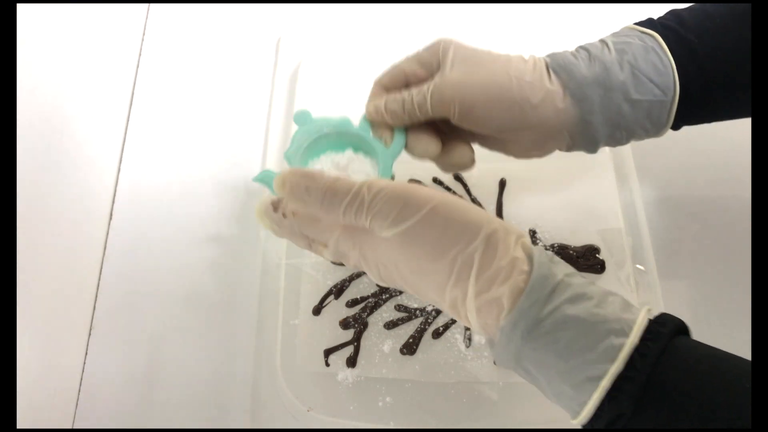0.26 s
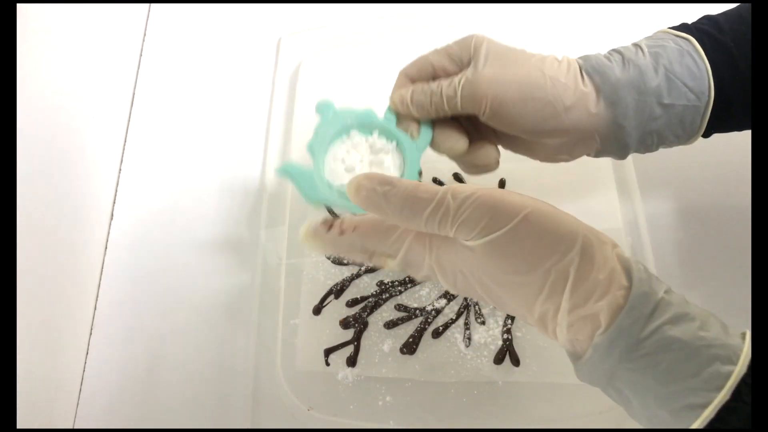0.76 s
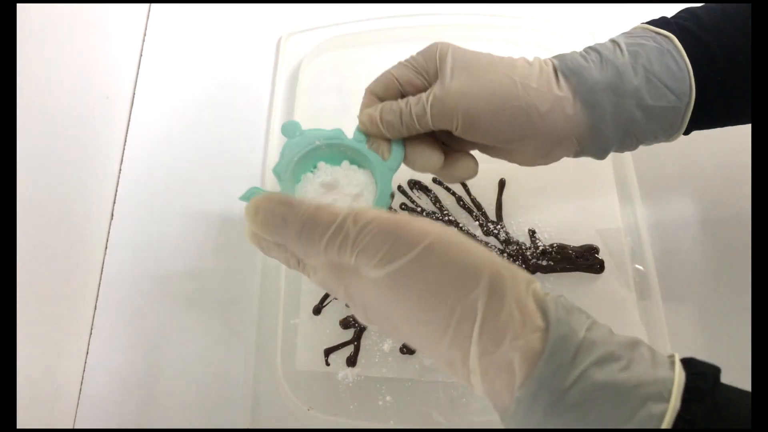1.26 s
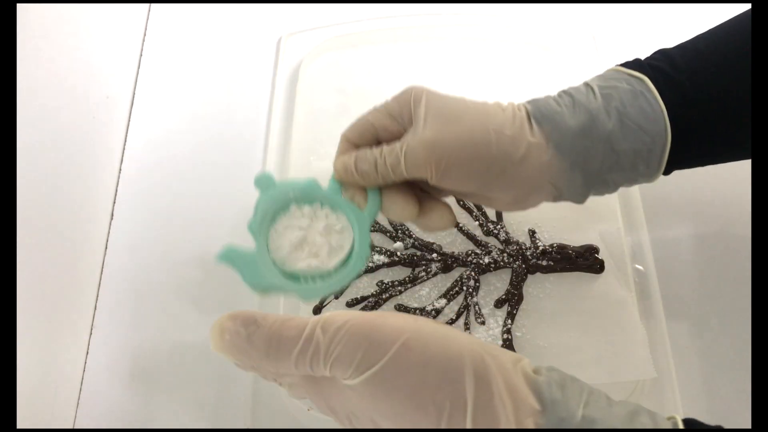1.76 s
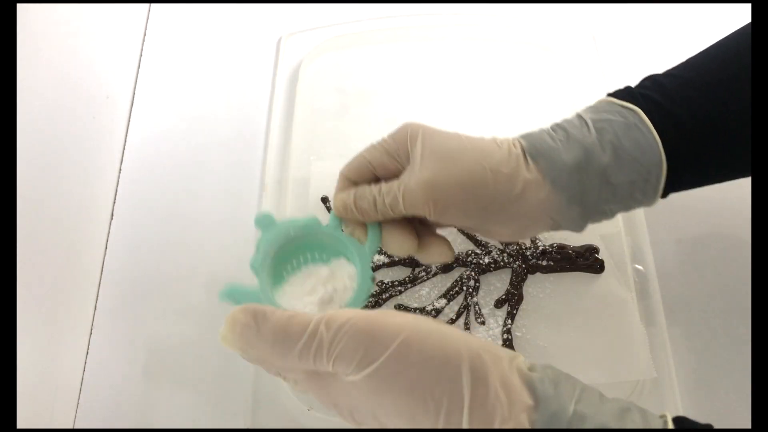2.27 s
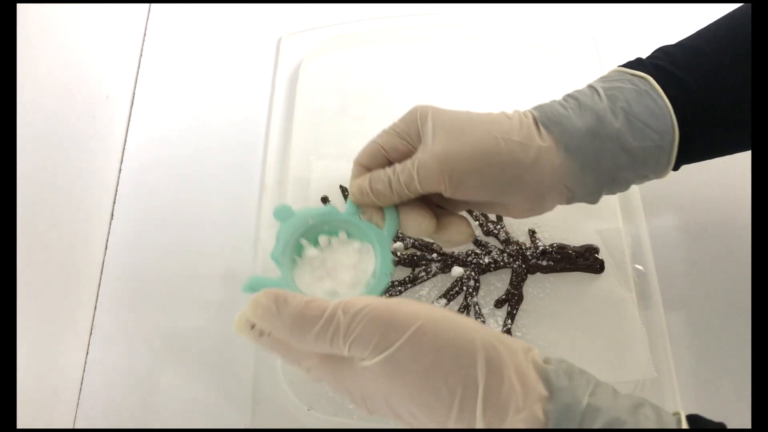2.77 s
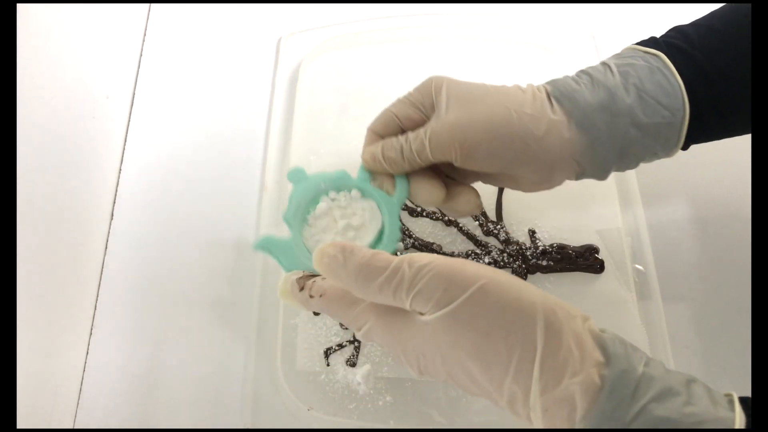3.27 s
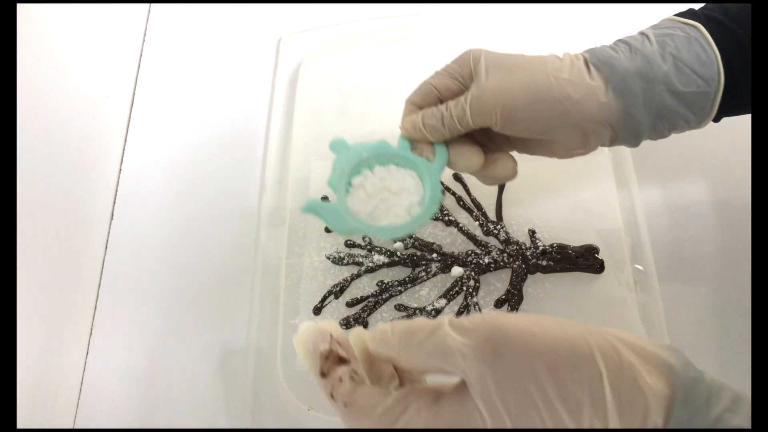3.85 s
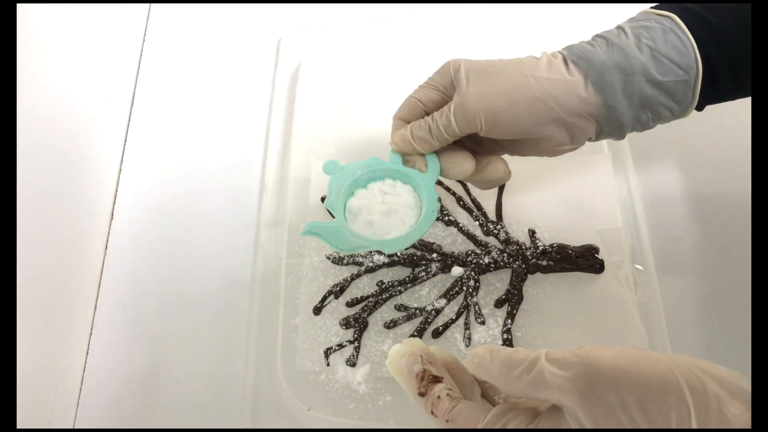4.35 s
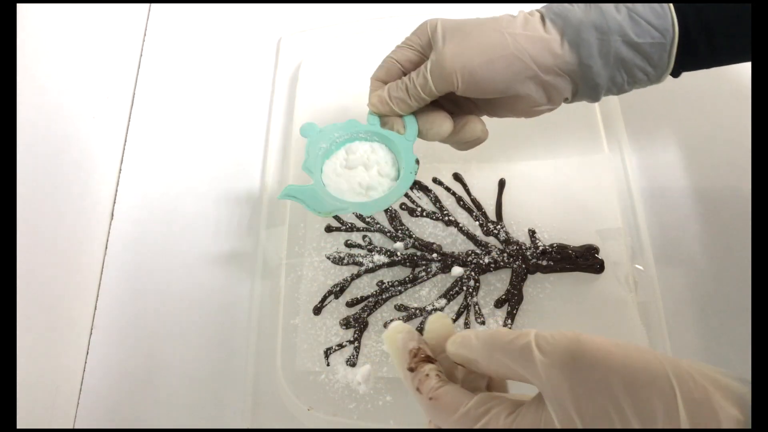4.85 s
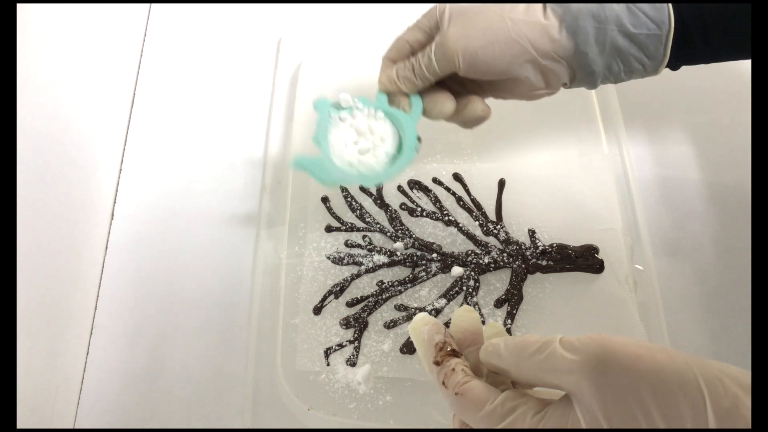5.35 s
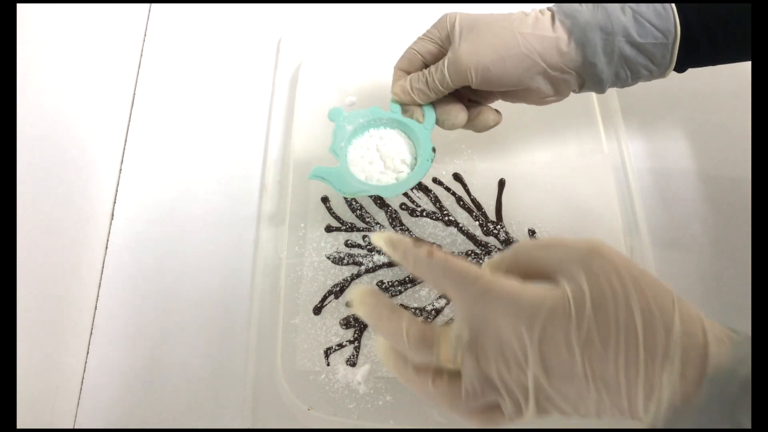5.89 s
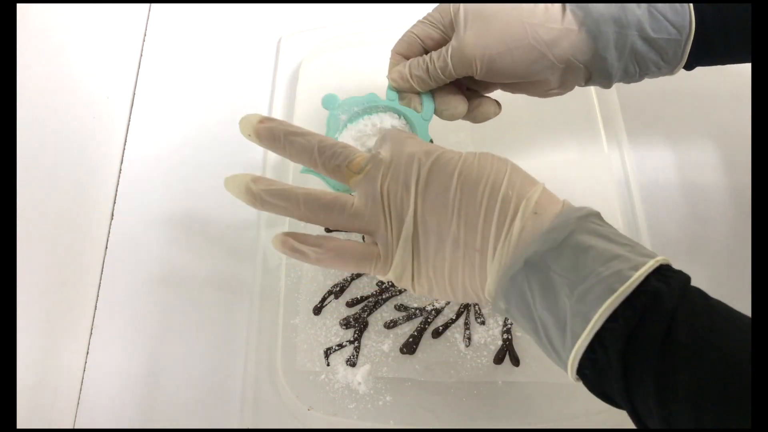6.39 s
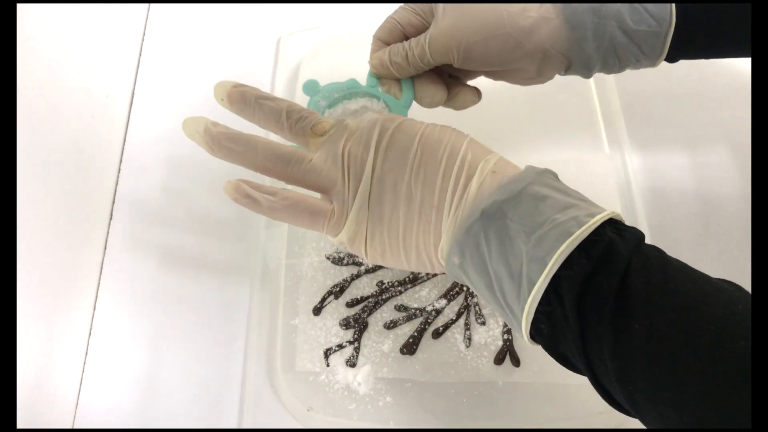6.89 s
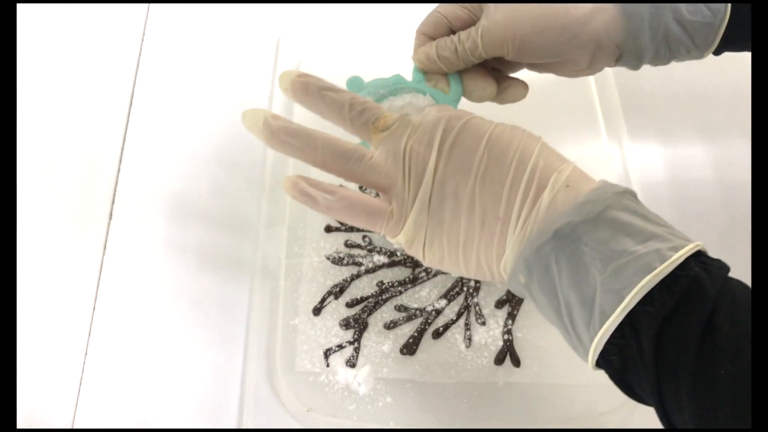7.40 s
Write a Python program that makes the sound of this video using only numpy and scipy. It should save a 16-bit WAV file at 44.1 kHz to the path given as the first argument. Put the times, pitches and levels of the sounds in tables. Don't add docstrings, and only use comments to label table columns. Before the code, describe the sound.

Light crisp ticks and short gritty swishes of sugar in a little plastic sieve, two dull table bumps, faint fridge hum behind.

```python
import sys
import numpy as np
from scipy import signal
from scipy.fft import rfft, irfft
from scipy.io import wavfile
from scipy.ndimage import uniform_filter1d

SR = 44100
rng = np.random.default_rng(int(sys.argv[2]) if len(sys.argv) > 2 else 0)


def amplitude_ratio(level_db):
    exponent = np.asarray(level_db, float) / 20
    return 10 ** exponent


def transcribe(signal):
    frames = np.atleast_2d(signal).T
    limited = np.clip(frames, -1, 1)
    pcm = np.round(limited * 32767).astype(np.int16)
    wavfile.write(sys.argv[1], SR, pcm)


N = 336483

# frequency in Hz, density in dB per Hz.
AIR_SPECTRUM = [(18, -51), (36, -11.5), (170, 0.5), (328, -3.5), (461, -7), (512, -7), (569, -6),
                (1070, -17.5), (2120, -21.5), (4530, -23), (8520, -28), (10200, -35), (11400, -32.5),
                (14400, -36.5), (16000, -39.5)]
AIR_DB = -55.5
# multiple of the turning rate, level in dB, unsteadiness in dB.
FRIDGE_LINES = [(2, -68.5, 5.5), (3, -74, 1.5), (4, -63, 7), (5, -60.5, 7), (6, -65, 6.5), (8, -70, 4),
                (13, -62, 1.5)]
FRIDGE_TURNS_HZ = 39.9
ECHO_DB, ECHO_T60_S = -13.5, 0.44

# time in seconds, level in dB.
SIFTING_LEVELS = [(0.0, -62.5), (1.32, -69), (2.15, -62), (2.44, -60), (2.95, -64), (3.4, -61),
                  (3.7, -60.5), (3.92, -60.5), (4.07, -54), (4.33, -56.5), (5.3, -69.5), (6.18, -52.5),
                  (6.38, -49.5), (6.54, -53), (7.07, -61.5), (7.22, -55), (7.46, -99), (7.63, -52)]

# frequency in Hz, level in dB, 60 dB decay time in seconds.
TABLE_MODES = [(165, -13, 0.07), (248, -26.5, 0.052), (322, 2, 0.06), (440, 0.5, 0.039), (573, 1.5, 0.125),
               (648, -10.5, 0.1), (764, -7.5, 0.12), (914, -1.5, 0.06), (1100, -9, 0.053),
               (1270, -3, 0.031), (1935, -18, 0.08), (1438, 0, 0.055), (1643, -1, 0.03),
               (1704, -16.5, 0.098), (2010, -20, 0.09), (2260, -16.5, .04), (2530, -5, 0.07),
               (2640, -8.5, 0.04), (2950, -12, .06)]
# start in seconds, blow in dB, judder in dB, judder length in ms, favoured modes in Hz.
TABLE_BUMPS = [(.113, -53, -77, 8.5, 1410), (1.731, -55.5, -76, 9.2, 1400), (1.909, -55, -71, 10, 990),
               (2.099, -50, -73, 10, 1210), (2.298, -61, -52.5, 18, 1100), (2.495, -13.5, -45, 5.3, 960),
               (2.506, -27, -38, 89, 614), (2.558, -33, -36.5, 40, 1260), (2.565, -30, -41, 60, 412),
               (2.652, -52, -49, 42, 590), (4.556, -59, -75, 10, 1390), (5.594, -51, -36, 25, 820),
               (5.611, -25, -39, 19, 835), (5.634, -32.5, -36, 13, 1100), (5.647, -28, -42.5, 43, 1600),
               (5.668, -31, -34, 12, 380), (5.69, -32, -48, 17, 380), (5.743, -34.5, -50, 16, 373),
               (5.812, -38, -60, 20, 350), (5.839, -43, -52, 29, 310), (5.862, -41, -53, 18, 290),
               (7.007, -63, -67, 13, 2000)]
CONTACT_MS, SOFTNESS = 0.43, 1.32

# frequency in Hz, width in Hz, level in dB.
SIEVE_MODES = [(2570, 580, 0.5), (3440, 540, -5.5), (3340, 110, -2.5), (4305, 860, 0), (4600, 130, -3),
               (5300, 690, -7.5), (5900, 150, -3.5), (6610, 450, -5), (7366, 180, -1.5), (8400, 370, 2.5),
               (9330, 660, 2), (11220, 880, 6), (11540, 1100, 9), (12770, 640, 11.5), (14300, 900, 7.5),
               (16300, 400, -22)]
MODE_GROUP_EDGES_HZ = (2800, 5500, 9500, 16000)
MESH_DB = 3.5

# start in seconds, contact in ms, level in dB, mode in Hz.
LUMP_PINGS = [(0.125, 3.5, -43, 7160), (0.297, 6.3, -42.5, 3620), (0.3, 7.7, -42.5, 6550),
              (0.301, 3.5, -45, 9500), (0.456, 3.5, -36.5, 4340), (0.489, 9.5, -48, 4880),
              (0.493, 7, -42, 6270), (0.496, 1.5, -39, 9300), (0.651, 3.6, -42, 10740),
              (0.652, 2.6, -40, 4800), (0.683, 1.5, -33.5, 9400), (0.699, 1.6, -31, 6430),
              (0.701, 2.3, -34.5, 4130), (0.864, 1.7, -26.5, 4350), (0.885, 1.7, -39, 4820),
              (0.887, 11, -48, 3790), (1.31, 2.0, -38, 5400), (1.319, 4.5, -42.5, 5030),
              (1.534, 2.0, -40, 4820), (1.632, 2.5, -40, 4580), (1.645, 1.5, -32.5, 11150),
              (1.644, 1.9, -30, 4480), (1.738, 4.3, -40.5, 5530), (1.848, 1.3, -33.5, 4650),
              (1.909, 2.6, -46, 8610), (1.909, 4.5, -47, 4130), (1.98, 1.3, -60, 11700),
              (2.044, 3, -37, 4570), (2.046, 1.5, -32, 9130), (2.1, 5.0, -42.5, 6840),
              (2.102, 3.0, -45, 8700), (2.105, 1.7, -37.5, 3230), (2.186, 1.5, -37.5, 6000),
              (2.233, 4.5, -40, 8500), (2.25, 1.5, -38, 4550), (2.25, 1.5, -32.5, 12230),
              (2.284, 2.5, -35.5, 6050), (2.301, 5.5, -52.5, 11000), (2.315, 1.5, -33, 13780),
              (2.446, 4.5, -42.5, 8270), (2.488, 1.1, -31.5, 5680), (2.662, 2.0, -37, 6220),
              (2.664, 2.0, -41, 7700), (2.664, 4.7, -41, 4780), (2.998, 1.5, -36, 4730),
              (3.034, 2.8, -39.5, 6630), (3.196, 1.3, -31, 11800), (3.196, 1.5, -33.5, 9200),
              (3.196, 2.5, -49, 7400), (3.341, 4.5, -42, 8700), (3.342, 1.6, -37, 11400),
              (3.38, 5.9, -40, 4430), (3.397, 2.6, -35.5, 3250), (3.499, 1.5, -38, 6600),
              (3.499, 2.7, -27.5, 4320), (3.501, 2.4, -31, 5730), (4.014, 1.1, -34.5, 10600),
              (4.153, 2.4, -28.5, 5150), (4.154, 1.5, -26.5, 5900), (4.157, 5.5, -51, 7000),
              (4.478, 1.5, -35, 5030), (4.477, 2.0, -36, 12000), (4.476, 4.0, -42, 8640),
              (4.551, 1.3, -35, 10500), (4.552, 4.5, -38, 4130), (4.558, 2.5, -53, 8550),
              (4.81, 2.5, -40.5, 5070), (4.885, 1.9, -35, 4380), (5.344, 1.9, -38.5, 8550),
              (5.425, 1.4, -49, 12700), (5.425, 1.5, -27.5, 8780), (5.426, 2.3, -39, 5200),
              (5.611, 5.0, -41, 3790), (5.616, 1.5, -33, 5300), (5.65, 1.5, -40, 8790),
              (5.667, 1.5, -37, 5860), (5.712, 1.1, -30, 10850), (5.713, 6.0, -47, 5100),
              (5.763, 2.3, -37.5, 5770), (5.764, 1.1, -26, 9540), (5.765, 1.7, -32, 7200),
              (5.871, 2.5, -38, 12900), (5.871, 3.5, -42, 4250), (6.468, 4.1, -37, 4300),
              (6.486, 5.5, -41, 3760), (6.51, 11, -42.5, 4130), (6.772, 2.5, -42, 7580),
              (6.772, 3.7, -41, 4480), (6.788, 3.5, -47, 4480), (6.991, 2.1, -21, 4130),
              (6.993, 4.0, -42, 8610), (7.007, 5.9, -39, 2760), (7.039, 4.7, -41.5, 4130),
              (7.096, 1.5, -41, 11700), (7.165, 5.9, -38.5, 3670), (7.19, 2.4, -37.5, 4320)]
# start in seconds, contact in ms, level in dB, mode in Hz.
LUMP_SCRAPES = [(.055, 14, -59.5, 5450), (0.3, 3.9, -60, 1440), (.495, 5, -66, 1450),
                (0.837, 10, -48, 10800), (1.308, 5, -62, 1520), (1.825, 32, -52, 11150),
                (4.301, 18, -51.5, 8280), (4.624, 29, -52, 8500), (5.814, 1.5, -47, 2200),
                (6.24, 11.5, -49.5, 8600), (6.245, 18, -57, 6600), (6.255, 12, -50, 9750),
                (6.315, 42, -51, 3860), (6.595, 20, -55.5, 4940), (6.93, 37, -60, 5450),
                (6.972, 5, -39.5, 4170), (7.42, 48, -51.5, 3530), (7.425, 49, -51, 4490),
                (7.435, 40, -49, 6220), (7.455, 23, -52, 8060), (7.575, 32, -57, 6250)]
PING_RISE, PING_FALL = 0.25, 0.92
PING_DB, PING_WANDER = 1, 0.051

# start in seconds, level in dB, centre in Hz.
RIM_TICKS = [(0.112, -35, 6400), (0.457, -35, 4600), (0.651, -40, 10900), (1.029, -28, 11200),
             (1.633, -31, 4970), (1.85, -29, 5000), (1.974, -39, 13300), (1.981, -15.5, 9100),
             (2.031, -22, 10200), (2.228, -27, 8400), (2.237, -31, 8980), (2.28, -12, 8240),
             (2.285, -16, 5160), (2.493, -16, 3440), (2.56, -36, 4000), (2.689, -23, 8800),
             (2.774, -31, 4600), (2.832, -43, 11000), (3.449, -35, 13000), (.535, -42, 13500),
             (3.212, -22, 7400), (3.342, -29, 8800), (3.62, -44, 8000),
             (4.013, -35, 9900), (4.132, -31, 8800), (4.378, -32, 12500), (4.795, -34, 13000),
              (4.671, -31, 6760), (4.887, -34, 5900), (4.969, -24, 9850), (5.169, -18, 12200),
              (5.28, -34, 2300), (5.617, -26, 5300), (5.634, -17.5, 4280), (5.648, -4.5, 5700),
              (5.65, -16, 2500), (5.722, -26, 7040), (5.871, -25, 9800), (6.47, -40, 4600),
              (6.488, -40, 4200), (6.996, -31, 4400), (7.189, -45, 4270)]

# peak in seconds, length in ms, level in dB, brightness in
# dB.
RIM_KNOCKS = [(.111, 19, -31, -7), (1.306, 20.4, -35, 0.5), (.527, 25, -61, -2), (.682, 3, -32, 11),
              (.697, 29, -37, -3.5), (.839, 7.3, -53, 4), (.865, 2.8, -29, -3), (.885, 20, -38, -7.5),
              (1.029, 7.8, -53.5, 12), (1.092, 21, -60, 7), (1.507, 7.2, -53, -13), (1.645, 2.7, -35, 3),
              (2.045, 3.6, -28, -3.5), (2.098, 20, -35.5, -4.5), (2.186, 2.1, -52, -5.5),
              (2.251, 1.6, -36.5, -4), (2.3, 36, -38.5, 9), (2.489, 29, -38.5, 3.5), (2.559, 13, -50, 3),
              (2.659, 32, -45.5, -2), (2.961, 4.2, -47, 7.5), (2.999, 1.45, -48, -14.5),
              (3.034, 25, -41, -7), (3.196, 3.5, -32.5, -7), (3.397, 31, -43.5, -5.5), (3.5, 5, -39, -8),
              (3.658, 10, -60, -22.5), (3.727, 3.6, -54.5, 13),
              (4.154, 3.4, -22.5, -6), (4.478, 4.2, -38, -4), (4.81, 5.5, -41, -7),
               (4.884, 17, -42.5, 2.5), (4.968, 37, -51, 2.5), (5.298, 1.7, -53, 6), (5.425, 6.2, -46, 13),
               (5.65, 1.2, -40, 0), (5.712, 0.78, -29, -12), (5.763, 3.5, -30, 4), (5.771, 19, -48, 6),
               (5.943, 1.9, -45, 14), (5.979, 4.9, -57.5, -15.5), (6.992, 3.4, -28, -20.5),
               (7.096, 6.2, -50.5, 7)]
# peak in seconds, length in ms, level in
# dB, brightness in dB.
MESH_LANDINGS = [(.299, 20, -36.5, -3), (.439, 5.6, -47.5, -3), (.495, 12, -36, -8.5),
                 (.651, 19, -47.5, 2.5), (1.533, 3, -34, 0), (1.535, 10.5, -41, -4),
                 (1.735, 11.5, -37.5, 0.5), (1.91, 9.6, -34.5, -5), (1.979, 6.8, -46, 8),
                 (2.497, 1.4, -43, -19), (2.618, 11, -43, 1), (2.886, 4.9, -49, -7.5),
                 (3.183, 1.5, -45.5, 12), (3.342, 4.1, -41, -2), (3.508, 19, -54, -5),
                 (4.014, 15, -51.5, 1), (4.556, 19, -41, 3.5), (4.718, 24, -48, 2.5),
                 (5.236, 26, -55.5, 3.5), (6.471, 1.3, -40, -12)]
# peak in seconds, length in ms, level in dB,
# brightness in dB.
WALL_RUNS = [(.068, 15, -58, 3), (.259, 10.7, -47, 5), (.459, 7.4, -50, 0), (.974, 8.7, -56.5, -3),
             (1.853, 13.6, -48.5, -2), (2.934, 9.5, -43.5, 0.5), (3.004, 25, -53.5, 1.5),
             (3.48, 8.5, -55, -3), (3.956, 12.4, -53, -2), (4.142, 13, -50, 6), (4.226, 16.5, -43.5, 1.5),
             (4.317, 14.6, -56.5, 3), (4.407, 13, -41.5, 1), (4.819, 13.6, -50, -0.5),
             (5.175, 14, -46, -1.5), (5.35, 13.6, -48, 3), (5.517, 18, -50.5, 1.5), (5.618, 11.2, -44, 1),
             (7.433, 14, -54, -4), (7.612, 16, -54, -6.5)]
# peak in seconds, length in ms, level in dB,
# brightness in dB.
MESH_SLIDES = [(.694, 51, -64, -3), (.869, 23, -46.5, -3), (1.446, 14, -53.5, 6), (1.654, 16, -51, 3),
               (2.051, 18, -48, 2.5), (2.256, 18, -45.5, 8.5), (2.29, 14, -33, -12.5),
               (2.452, 15.7, -48.5, 4.5), (2.578, 36, -58, -1), (2.73, 24, -63, 4), (3.192, 35, -52.5, 3),
               (3.242, 7.4, -38, -3.5), (3.31, 14, -53, -7.5), (3.368, 17.4, -36, 1),
               (3.617, 58, -62, -6.5), (4.161, 8.8, -42, -2), (4.484, 12, -45, 5), (4.649, 21, -54.5, -2),
               (5.073, 11, -59.5, -1), (5.429, 13, -49.5, 5), (5.657, 15, -44, -5), (5.728, 18, -42, -1.5),
               (5.871, 13, -55, 0), (5.945, 12, -51.5, 3)]
# peak in seconds, length in ms, level in dB, brightness in dB.
FINGER_STIRS = [(6.226, 26, -56, -4), (6.258, 40, -54.5, -2.5), (6.341, 42, -55, -10),
                (6.484, 29.5, -46, -9.5), (6.517, 13, -59, -6), (6.708, 23, -54.5, -10.5),
                (6.771, 21, -41, -7), (6.957, 68, -60, -7), (7.008, 23, -39, -11), (7.17, 19, -47, -7),
                (7.457, 19, -58, 0), (7.481, 20, -51.5, -3)]
# offset of the rise in ms, rise per length, fall per length, outer modes in dB #
KNOCK, LANDING = (0.83, 0.02, 0.94, 0.1), (5.4, 0.01, 1.19, 0.1)
RUN, SLIDE, STIR = (-15.5, 3, 0.98, -1.5), (-1.3, 1.21, 1.53, -0.75), (3.1, 0.69, 1.17, 0.38)
USUAL_DB, FAINT_DB, FOCUS_DB_PER_DB = -53.5, -48.5, 0.73
SWING_FROM_S, STIR_FROM_S = 3.85, 6.08


def level(x, db):
    return x * amplitude_ratio(db) / np.sqrt(np.mean(x ** 2))


def walk(rate):
    hold = int(SR / rate)
    steps = np.repeat(rng.standard_normal(N // hold + 1), hold)
    return 1.3 * uniform_filter1d(uniform_filter1d(steps, hold), hold)[:N]


def add(out, x, start):
    lo, hi = max(start, 0), min(start + len(x), len(out))
    out[lo:hi] += x[lo - start:hi - start]


def band(x, lo_hz, hi_hz):
    return signal.sosfilt(signal.butter(2, (lo_hz, hi_hz), "band", fs=SR, output="sos"), x)


def high_pass(x, order, hz):
    return signal.sosfilt(signal.butter(order, hz, "high", fs=SR, output="sos"), x)


def kitchen_air():
    f = np.fft.rfftfreq(N, 1 / SR) + 1
    hz, db = np.transpose(AIR_SPECTRUM)
    spectrum = rfft(rng.standard_normal(N)) * amplitude_ratio(np.interp(np.log(f), np.log(hz), db))
    air = np.zeros(N)
    for octave in np.arange(4, 15):
        share = np.cos(np.pi / 2 * np.clip(np.log2(f) - octave, -1, 1)) ** 2
        air += irfft(spectrum * share, N) * amplitude_ratio(0.56 * walk(1.506) + 1.3 * walk(9))
    return level(air, AIR_DB)


def fridge():
    t = np.arange(N) / SR
    hum = np.zeros(N)
    for turns, db, loose_db in FRIDGE_LINES:
        line_db = db + 2.0 + loose_db * np.tanh(walk(10))
        phase = 0.5 * walk(7) + 6 * rng.random()
        hum += amplitude_ratio(line_db) * np.sin(2 * np.pi * turns * FRIDGE_TURNS_HZ * t + phase)
    return hum


def tiled_room_echo():
    t = np.arange(SR // 2) / SR
    fade = np.exp(-np.log(1000) * t / ECHO_T60_S)
    body = band(rng.standard_normal(len(t)), 56, 3800) * fade
    treble = 1.1 * rng.standard_normal(len(t)) * fade ** 2
    echo = (body + treble) * (t > 0.004)
    return echo * amplitude_ratio(ECHO_DB) / np.sqrt(np.sum(echo ** 2))


def sifting():
    s, db = np.transpose(SIFTING_LEVELS)
    patter = rng.standard_normal(N) * amplitude_ratio(1.6 * walk(90))
    return level(band(patter, 1670, 5050), 0) * amplitude_ratio(np.interp(np.arange(N) / SR, s, db) - 5.0)


def table_bumps(size=9000):
    out, t = np.zeros(N), np.arange(size) / SR
    hz, db, t60 = np.transpose(TABLE_MODES)[:, :, None]
    alternate = (-1) ** np.arange(len(hz))[:, None]
    for s, blow_db, judder_db, judder_ms, near_hz in TABLE_BUMPS:
        share, shift = rng.standard_normal((2, len(hz), 1))
        gain = amplitude_ratio(db + 0.093 * share - 1.2 * np.log2(hz / near_hz) ** 2) * alternate
        rings = np.sin(2 * np.pi * hz * (1 + 0.017 * shift) * t) * np.exp(-np.log(1000) * t / t60)
        body = (gain * rings).sum(axis=0)
        rattle = band(rng.standard_normal(size), 196, 5700) * np.exp(-np.log(1000) * t / 0.056)
        body += amplitude_ratio(13.5) * rattle
        contact_ms = CONTACT_MS * (1000 / near_hz) ** SOFTNESS
        push = np.sin(np.pi * np.clip(1000 * t[:200] / contact_ms, 0, 1)) ** 2
        push = push / push.sum() + amplitude_ratio(-23.5) * (t[:200] == 0)
        force = amplitude_ratio(judder_db - 20.5) * rng.standard_normal(size) * np.exp(-(1000 * t / judder_ms) ** 2)
        force[0] = amplitude_ratio(blow_db)
        add(out, signal.fftconvolve(np.convolve(force, push), body) * amplitude_ratio(-2.0), int(s * SR))
    return high_pass(out, 2, 160)


def pings(size=6000):
    out, ms = np.zeros(N), np.arange(size) * 1000 / SR
    for s, length, db, hz in LUMP_PINGS + LUMP_SCRAPES:
        looseness = PING_WANDER * np.sqrt(hz / 5000 * np.clip(length / 5.5, 1, 4))
        wander = np.cumsum(rng.standard_normal(size)) * looseness
        grit = uniform_filter1d(rng.standard_normal(size), size=64) * np.sqrt(64)
        grit_db = 5 * min(length / 10, 1) * grit
        fall = ms / (PING_FALL * length)
        shape = (1 - np.exp(-ms / (PING_RISE * length))) * np.exp(-fall)
        shape *= np.exp(min(length / 30, 0.7) * (fall - (ms / (2.0 * length)) ** 4 * 3))
        tone = np.sin(2 * np.pi * hz * ms / 1000 + wander)
        add(out, amplitude_ratio(db + PING_DB + grit_db) * shape / shape.max() * tone, int(s * SR))
    return out


def ticks(size=400):
    out, t = np.zeros(N), np.arange(size) / SR
    hz, width, db = np.transpose(SIEVE_MODES)[:, :, None]
    for s, tick_db, centre_hz in RIM_TICKS:
        share, turn = rng.standard_normal((2, len(hz), 1))
        gain = amplitude_ratio(db + 5 * share - 22 * np.log2(hz / centre_hz) ** 2)
        rings = np.sin(2 * np.pi * hz * t + 3 * turn) * np.exp(-np.pi * 1.6 * width * t)
        tick = (gain * rings).sum(axis=0) * (1 - np.exp(-t / 0.000057))
        add(out, tick * amplitude_ratio(tick_db - 7.5) / np.abs(tick).max(), int(s * SR))
    return high_pass(out, 4, 2300)


def tosses(start_s, end_s):
    ways = ((RIM_KNOCKS, KNOCK), (MESH_LANDINGS, LANDING), (WALL_RUNS, RUN),
            (MESH_SLIDES, SLIDE), (FINGER_STIRS, STIR))
    rows = []
    for events, (least, rise, fall, outer_db) in ways:
        for s, ms, db, bright_db in events:
            flank_db = outer_db - FOCUS_DB_PER_DB * (max(db, FAINT_DB) - USUAL_DB)
            rows.append((s, least + rise * ms, fall * ms, db, flank_db - bright_db, flank_db + bright_db))
    return sorted(row for row in rows if start_s <= row[0] < end_s)


def sieve_modes(f, hz, width, gain):
    return gain @ (1 / (1 + 1.3j * (f - hz[:, None]) / width[:, None]) ** 2)


def mesh_modes(bins):
    ripple = uniform_filter1d(uniform_filter1d(rng.standard_normal(bins), size=42), size=42)
    return 10 ** (np.conj(signal.hilbert(MESH_DB * 8 * ripple)) / 20)


def sugar(moves, lowest_hz, lumps_db, size=8192, lead=2048):
    out, f = np.zeros(N), np.fft.rfftfreq(size, 1 / SR)
    ms = (np.arange(size) - lead) * 1000 / SR
    hz, width, db = np.transpose(SIEVE_MODES)
    edges = np.searchsorted(f, MODE_GROUP_EDGES_HZ)
    centres = np.sqrt(np.multiply(MODE_GROUP_EDGES_HZ[1:], MODE_GROUP_EDGES_HZ[:-1]))
    rim = signal.sosfreqz(signal.butter(6, lowest_hz, "high", fs=SR, output="sos"), f, fs=SR)[1]
    for s, rise, fall, mid_db, low_db, high_db in moves:
        swell = np.where(ms < 0, np.exp(-(ms / rise) ** 2), np.exp(-np.abs(ms / fall) ** 1.6))
        weight_db = lumps_db * uniform_filter1d(rng.standard_normal(size), size=40) * np.sqrt(40)
        force = rng.standard_normal(size) * amplitude_ratio(weight_db) * swell
        suddenness = 4.3 * np.exp(-rise / 1.05) * min(1.6 / fall, 1)
        force[lead] += suddenness * np.sqrt(np.sum(force ** 2))
        shift, share, sign = rng.standard_normal((3, len(hz)))
        gain = amplitude_ratio(db + 1.3 * share) * np.sign(sign)
        body = sieve_modes(f, hz * (1 + 0.026 * shift), width, gain) * mesh_modes(len(f))
        ring = rfft(force) * (body + amplitude_ratio(-11.0)) * rim
        power = 2 * np.add.reduceat(np.abs(ring) ** 2, edges)[:3] / size / np.sum(swell ** 2)
        lift_db = mid_db + np.array([low_db, 0, high_db]) - 10 * np.log10(power)
        add(out, irfft(ring * amplitude_ratio(np.interp(f, centres, lift_db))), int(s * SR) - lead)
    return out


def scene():
    background = kitchen_air() + fridge() + sifting()
    bumps = table_bumps()
    tapped = sugar(tosses(0, SWING_FROM_S), lowest_hz=3660, lumps_db=4.5)
    swung = sugar(tosses(SWING_FROM_S, STIR_FROM_S), lowest_hz=4130, lumps_db=4.5)
    stirred = sugar(tosses(STIR_FROM_S, N / SR), lowest_hz=3100, lumps_db=3.0)
    sieve = tapped + swung + stirred + ticks() + pings()
    room = signal.fftconvolve(bumps + amplitude_ratio(-1.5) * sieve, tiled_room_echo())[:N]
    return (sieve + bumps + room + background)[None]


def top_cut(x):
    return signal.sosfilt(signal.butter(12, 16830, fs=SR, output="sos"), x)


def record(dry):
    mix = high_pass(dry, 3, 42)
    f = np.fft.rfftfreq(N, 1 / SR)
    top_db = np.interp(f, (15700, 16000, 16700, 16900), (0, -30, -31, -90))
    return top_cut(irfft(rfft(mix) * amplitude_ratio(top_db), N))


dry = scene()
out = record(dry)
transcribe(out)
```